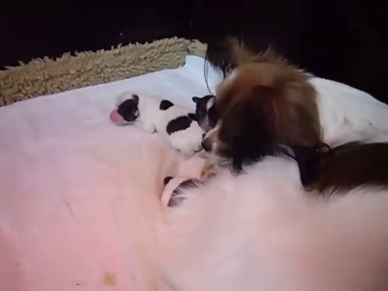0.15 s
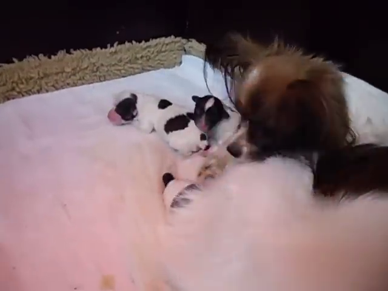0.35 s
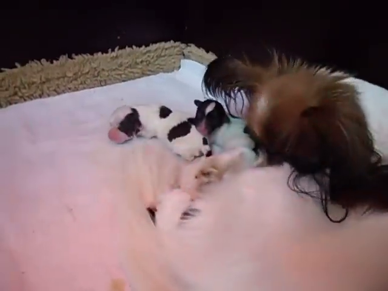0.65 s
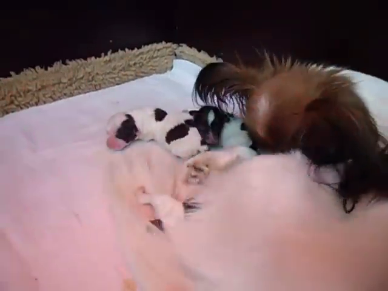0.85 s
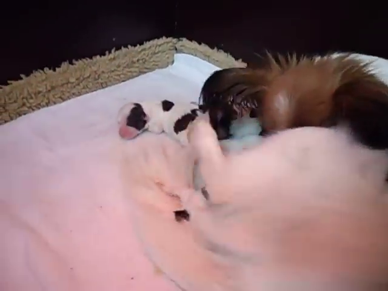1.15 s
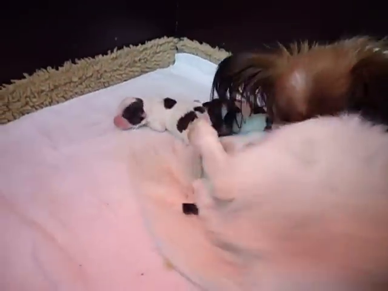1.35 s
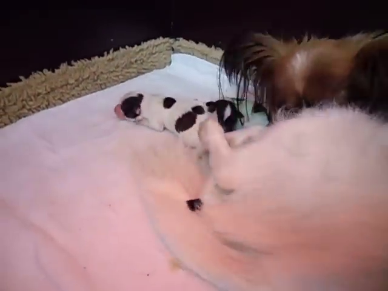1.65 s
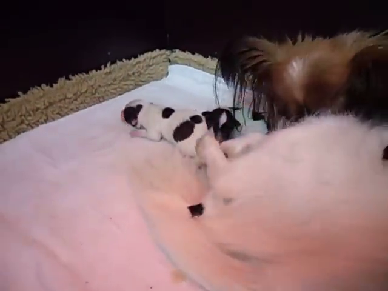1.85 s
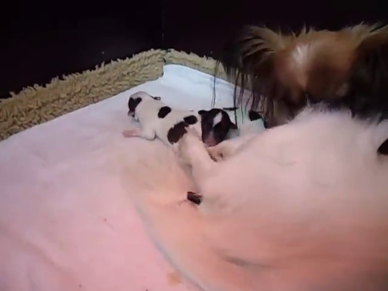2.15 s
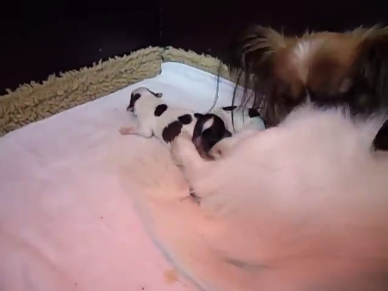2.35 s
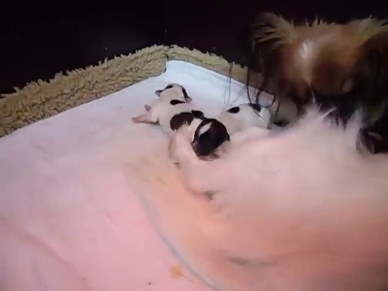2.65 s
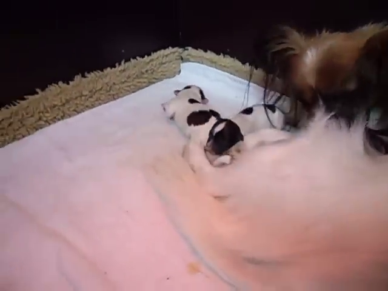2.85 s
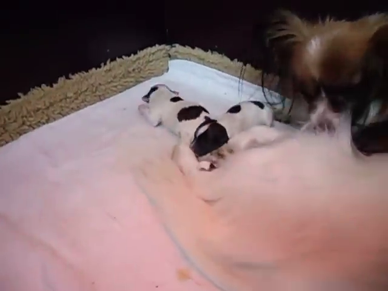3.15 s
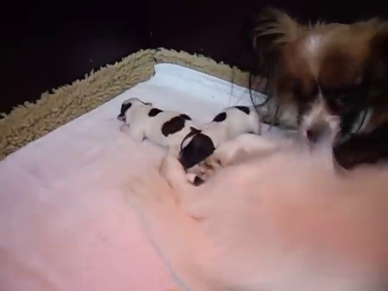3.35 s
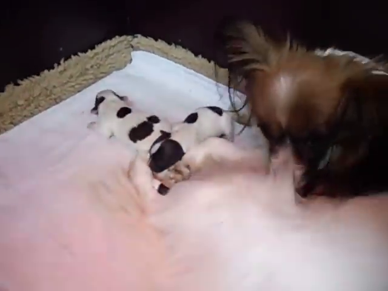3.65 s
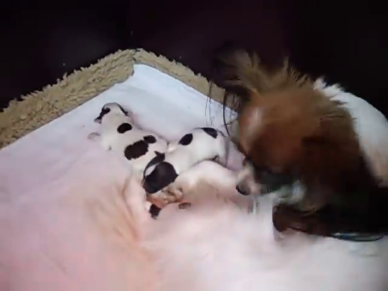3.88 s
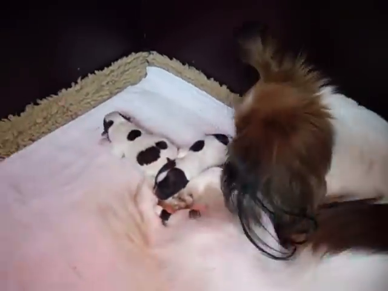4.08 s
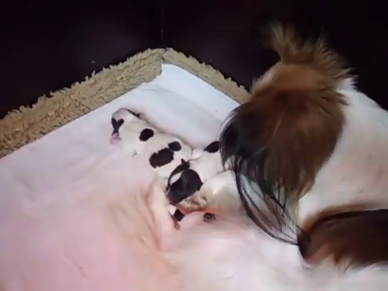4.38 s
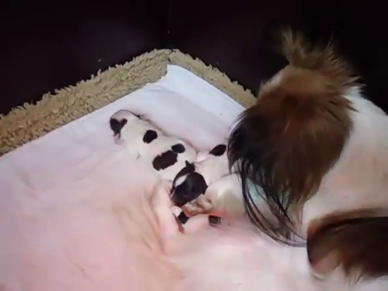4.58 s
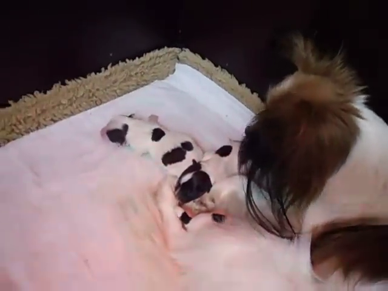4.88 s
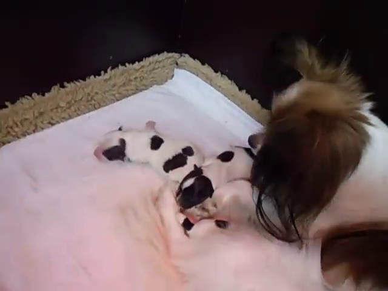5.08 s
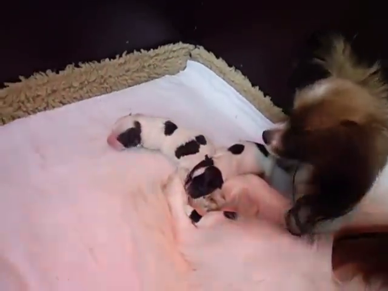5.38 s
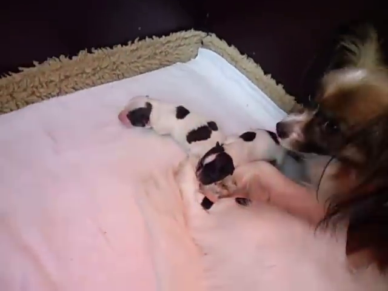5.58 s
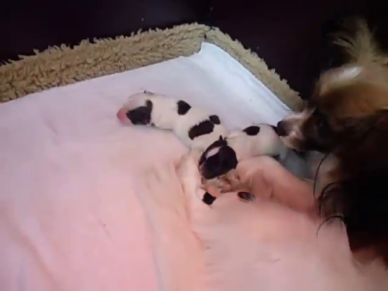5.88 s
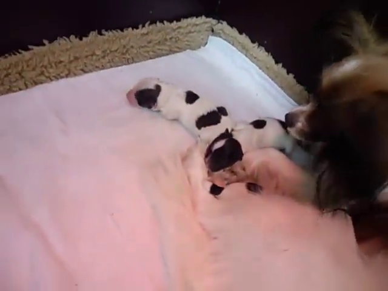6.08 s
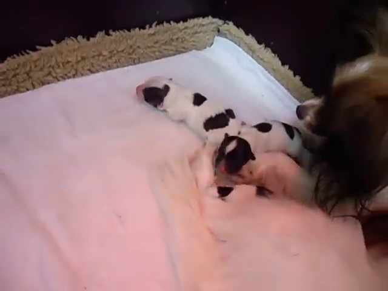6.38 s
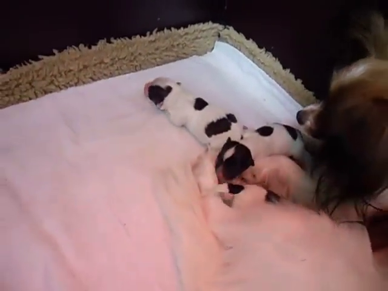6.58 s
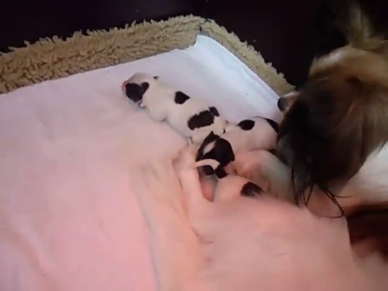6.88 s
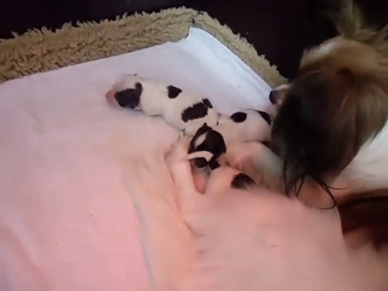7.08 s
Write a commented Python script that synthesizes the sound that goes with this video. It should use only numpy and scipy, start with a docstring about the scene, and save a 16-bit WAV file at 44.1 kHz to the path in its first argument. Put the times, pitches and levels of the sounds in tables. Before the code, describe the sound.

Newborn puppies are heard close up in a quiet furnished room, with a faint steady hiss, wavering low rumble and dull blanket brushing underneath. A sharp yelp starts at once and sinks to a low whine by 0.2 s. A weak squeak rises at 0.4 s, overtaken by a louder, brighter cry around 0.6-0.75 s. Low husky whimpers and a tiny grunt follow at 0.9-1.2 s. A thin squeal climbs from 1.5 to 1.9 s; another wavers from 2.2 to 2.7 s. A soft whine at 3.0 s leads into a high cry until 3.7 s. Stronger, piercing squeals come at 4.0-4.5, 4.7-5.1 and 5.3-5.8 s, catching and breaking briefly. Small closed-mouth grunts follow, then a raspy squeal at 6.0-6.45 s, more low grunts near 6.6 s, and a final thin, wavering cry from 6.75 s to the end. Faint wet ticks are scattered between.

```python
"""Newborn puppies in a whelping box

Puppies squeak in a padded box, close to a small camera in a quiet room. Their cries mostly rise and fall in pitch:
harmonics of tiny vocal folds ring in a short throat, rasp under strain and at times beat in threes.
Between cries come low whimpers and closed-mouth grunts, made the same way with more rasp, and small wet ticks of
noise. Underneath lie two wavering drones in a low rumble, dull brushing of the blanket and a steady hiss."""
import sys
import numpy as np
from scipy import signal
from scipy.fft import rfft, irfft, next_fast_len
from scipy.io import wavfile
from scipy.ndimage import uniform_filter1d, map_coordinates

SR = 44100
rng = np.random.default_rng(int(sys.argv[2]) if len(sys.argv) > 2 else 0)


def digitize_waveform(pressure):
    """Quantize a signal to 16-bit integers and store it at the path in sys.argv[1].

    Rows of a 2-D input are taken as channels; values are limited to [-1, 1].
    """
    field = np.atleast_2d(pressure).T
    bounded = np.clip(field, -1, 1)
    quanta = np.round(bounded * 32767).astype(np.int16)
    wavfile.write(sys.argv[1], SR, quanta)


N = 318843
T = np.arange(N) / SR  # seconds


def undb(db):
    """Decibels to gain."""
    return 10 ** (np.asarray(db) / 20)


def unit(x):
    """Scale to rms 1."""
    return x / np.sqrt(np.mean(x ** 2))


def curves(rows, t):
    """The columns of a table, joined by straight lines in time."""
    seconds, *columns = np.transpose(rows)
    return [np.interp(t, seconds, column) for column in columns]


def shape_db(points, hz):
    """Read a spectrum of (Hz, dB) points on a log-frequency axis."""
    f, db = np.transpose(points)
    return np.interp(np.log(np.maximum(hz, 1)), np.log(f), db)


def coloured(points):
    """Noise of rms 1 with a spectrum of the given (Hz, relative dB) shape."""
    size = next_fast_len(N)
    hz = np.arange(size // 2 + 1) * SR / size
    spectrum = rfft(rng.standard_normal(size)) * undb(shape_db(points, hz))
    return unit(irfft(spectrum, size)[:N])


def wander(hz, size):
    """Smooth random motion, mostly slower than hz, with a spread of about 1."""
    knots = np.arange(size) * 2 * hz / SR
    values = rng.standard_normal(int(knots[-1]) + 2)
    return map_coordinates(values, [knots], order=3, mode="nearest")


def swells(rows, t):
    """The sum of a bell-shaped swell for each row; half is the time from the centre to 1/e."""
    return sum(depth * np.exp(-((t - centre) / half) ** 2) for centre, half, depth in rows)


def hoarseness(hz, level_db, t, rough):
    """Total rasp of the folds, and the smaller part heard as air: strained folds vibrate chaotically."""
    # The folds break into a rasp. Each row: centre in seconds, half length in seconds, depth from 0 to 1.
    rasp_bursts = [(.105,0.013,0.38),(.228,.007,0.7),(.635,.013,0.04),(.982,0.015,0.54),(1.161,.0035,0.6),(1.555,0.069,.1),(2.243,.013,0.12),(2.705,0.02,0.63),(2.97,.008,0.1),(3.1,.019,0.25),(3.145,0.0055,0.4),(3.994,0.0048,0.5),(5.325,0.0089,0.07),(5.056,0.007,0.4),(6.057,0.012,0.15),(6.095,.02,.15),(6.23,0.037,.06),(6.765,0.003,.33),(6.797,0.0096,.18)]
    break_hz, break_width_hz, break_rasp, push_db = 1940, 200, 0.14, -38.5
    rise_hz_per_s, falling_share = 2000, .2
    collapse_s, collapse_hz, collapse_rasp = .018, 1300, .42
    break_air, collapse_air = 0.81, .15  # share of each kind of hoarseness that is heard as air
    # pushed hard through the change of register, the folds turn hoarse; much less so on the way down
    near_break = np.exp(-((hz - break_hz) / break_width_hz) ** 2)
    push = np.minimum(undb(level_db - push_db), 1)
    rising = np.clip(np.gradient(hz) * SR / rise_hz_per_s, 0, 1)
    strain = break_rasp * near_break * push * (falling_share + (1 - falling_share) * rising)
    # a call collapses at its end, most of all at low pitch
    collapse = collapse_rasp * np.exp((t - t[-1]) / collapse_s) / (1 + (hz / collapse_hz) ** 4)
    rasp = rough + strain + collapse + swells(rasp_bursts, t)
    airy = rasp - (1 - collapse_air) * collapse - (1 - break_air) * strain
    return rasp, airy


def throat_gains(hz, slope_db, bright_db, treble_db, roll_db):
    """Gains of eight harmonics: they fall with their number and rise in the throat's resonances."""
    # Throat and mouth of a puppy. Each row: frequency in Hz, relative gain in dB.
    throat = [(450,-14.5),(700,-13.5),(1000,-10),(1400,-6.5),(1800,-0.5),(2200,0),(2450,1),(2750,8),(3200,4),(3650,3.5),(4000,-3),(4400,-8),(5100,-14.5),(6000,-15.5),(6500,-9.5),(7000,-2.5),(7700,-13.5),(8400,-39.5)]
    upper_share = 0.34  # share of the brightness that reaches the harmonics above the octave
    k = np.arange(1, 9)[:, None]
    lift_db = bright_db * ((k == 2) + upper_share * (k > 2))
    lift_db = lift_db + (k > 2) * (treble_db + roll_db * np.log2(k / 3))
    gains = undb(shape_db(throat, k * hz) + slope_db * np.log2(k) + lift_db)
    gains = gains * (k * hz < SR / 4)
    return k, gains / np.linalg.norm(gains, axis=0)


def thirds_of_pitch(phase, fundamental, t):
    """Period tripling: unsteady lines at thirds of the pitch, strongest just under the octave."""
    # The voice beats in threes. Each row: centre in seconds, half length in seconds, depth from 0 to 1.
    triple_beats = [(1.598,0.034,0.12),(4.15,0.055,0.03),(5.6,0.13,0.06),(6.082,0.019,0.06),(6.115,0.018,0.08),(6.27,0.14,0.04),(6.87,0.032,0.17),(6.99,0.082,0.05),(7.19,.06,0.02)]
    depth = swells(triple_beats, t) * fundamental
    lines = 0
    for thirds, db in zip((1, 2, 4, 5), (-10.5, -12, -4, 0)):
        unsteady = undb(db + 3.0 * wander(25, len(t)))
        lines = lines + depth * unsteady * np.sin(thirds * phase / 3)
    return lines


def voice(rows, slope_db, rough, treble_db=0, roll_db=0, rasp_hz=520, jitter=.004, edge_s=.004):
    """One call as (tone, air level): harmonics of the folds slide through the fixed throat."""
    # The voice catches for an instant. Each row: centre in seconds, half length in seconds, dip in dB.
    voice_catches = [(1.538,0.0012,-16),(1.868,.005,-14),(4.917,.006,-12),(4.5,0.0035,-20),(5.4,0.0034,-26),(6.052,0.0021,-9.5),(5.5,0.0021,-27)]
    shimmer_db, rasp_depth, rasp_air_db, air_db = 2.0, 0.69, -4, -41
    first = max(int((rows[0][0] - edge_s / 2) * SR), 0)
    last = min(int((rows[-1][0] + edge_s / 2) * SR), N)
    t = T[first:last]
    size = len(t)
    hz, level_db, bright_db = curves(rows, t)
    # tension changes smoothly, with a slight tremble
    hz = uniform_filter1d(hz, size=500, mode="nearest") * (1 + jitter * wander(45, size))
    rasp, airy = hoarseness(hz, level_db, t, rough)
    # chaotic folds scatter the timing and strength of the cycles
    phase = 2 * np.pi * np.cumsum(hz) / SR + .3 * rasp * wander(rasp_hz, size)
    strength = undb(shimmer_db * wander(70.55, size) + swells(voice_catches, t))
    strength = strength * (1 + rasp_depth * rasp * wander(rasp_hz, size))
    k, gains = throat_gains(hz, slope_db, bright_db, treble_db, roll_db)
    tone = np.sum(gains * np.sin(k * phase), axis=0) + thirds_of_pitch(phase, gains[0], t)
    air = undb(air_db) + undb(rasp_air_db) * airy
    edges = np.clip(np.minimum(t - t[0], t[-1] - t) / edge_s, 0, 1)
    call = np.array([np.sqrt(2) * tone * strength, air]) * undb(level_db) * edges
    return np.pad(call, ((0, 0), (first, N - last)))


def glide(event, arch=0., release_s=.025):
    """The controls of a short call: a slide of pitch, arched if asked, under attack, hold and release."""
    start, length, first_hz, last_hz, db, bright_db = event
    attack_s, fade_db = .016, 10
    u = np.linspace(0, 1, 33)
    hz = (first_hz + (last_hz - first_hz) * u) * (1 + arch * np.sin(np.pi * u) ** 2)
    held = np.clip(np.minimum(u * length / attack_s, (1 - u) * length / release_s), 0, 1)
    level_db = db - fade_db * (held.max() - held)
    return np.transpose([start + u * length, hz, level_db, np.full_like(u, bright_db)])


def open_calls():
    """Cries, squeaks and whimpers: their air hisses in the open mouth's main resonance."""
    # The long cries. Each row: treble in dB, roll-off above the third harmonic in dB per octave, and a
    # curve of points: time in seconds, pitch in Hz, level in dB, brightness in dB.
    long_cries = [(1.5, -0.5, [(0.0, 1268, -31, 0), (0.007, 1213, -42.5, 9), (0.031, 1376, -40.5, -5),
                  (0.063, 1436, -37.5, 3.5), (0.075, 1453, -43, -18), (0.089, 1421, -38, 8.5),
                  (0.097, 1302, -48, 3), (0.121, 985, -43, 2), (0.181, 751, -49.5, 6),
                  (0.221, 737, -48.5, 12), (0.231, 777, -52, -3)]), (-1.5, 2, [(0.403, 1092, -59, 1),
                  (0.414, 1032, -54.5, -4.5), (0.438, 1167, -51.5, 8.5), (0.468, 1365, -50, -11.5),
                  (0.502, 1502, -47, 5), (0.566, 1444, -46.5, 5.5), (0.626, 1353, -52, 1),
                  (0.65, 1000, -49, -7)]), (1, 0.5, [(1.49, 1330, -48.5, -1), (1.503, 1230, -43.5, -1.5),
                  (1.529, 1515, -38.5, 8), (1.557, 1605, -37.5, -7), (1.575, 1680, -46, 10.5),
                  (1.629, 1805, -44.5, -5.5), (1.649, 1790, -49.5, 6), (1.683, 2151, -53.5, 2),
                  (1.757, 2212, -49, -4.5), (1.815, 2162, -52.5, 2), (1.853, 2030, -69, 13),
                  (1.878, 1921, -54, 1.5), (1.912, 1570, -61, -3), (1.918, 1584, -77, -4)]),
                  (-12, -6, [(2.2, 1665, -51, 7), (2.219, 1731, -43, 12), (2.301, 1902, -48, -15),
                  (2.335, 1580, -50, 22), (2.359, 1447, -55.5, 3), (2.385, 1550, -54.5, 12.5),
                  (2.401, 1775, -56.5, 5), (2.459, 1915, -47.5, -10), (2.489, 1965, -52, -1.5),
                  (2.567, 1944, -48, -17), (2.586, 2012, -54, -14), (2.622, 2088, -45.5, -15),
                  (2.65, 1918, -44.5, -12), (2.696, 1377, -54.5, -2.5), (2.718, 1120, -60.5, -18)]),
                  (3, -28, [(2.965, 860, -60, 4), (2.972, 831, -65, -7.5), (3.02, 935, -48, 17),
                  (3.058, 908, -55, 13), (3.096, 830, -57, -5), (3.124, 895, -52.5, 12),
                  (3.192, 1086, -48.5, 23), (3.244, 1176, -48.5, 7.5), (3.284, 1403, -52.5, -2.5),
                  (3.304, 1675, -66, -12)]), (-6.5, -6, [(3.303, 1670, -52, -14), (3.316, 1770, -49, -6),
                  (3.345, 2063, -46.5, 4), (3.395, 1899, -42.5, 6), (3.459, 2236, -43.5, -3),
                  (3.477, 2262, -48, 3), (3.501, 2233, -41.5, 1), (3.547, 2057, -39, 7.5),
                  (3.617, 2144, -44, 7.5), (3.651, 2003, -39.5, 6.5), (3.671, 1864, -40.5, 2),
                  (3.697, 1436, -47.5, -2), (3.705, 1185, -43.5, -5.5), (3.719, 1035, -59.5, -6)]),
                  (-6, -14, [(3.95, 1440, -45.5, 3), (3.967, 1583, -37.5, 8.5), (3.999, 1910, -42, 4.5),
                  (4.013, 2004, -33, -2.5), (4.093, 2247, -44, 2.5), (4.123, 2220, -46, 2),
                  (4.171, 2316, -41, -2.5), (4.215, 2222, -36.5, 1.5), (4.269, 2215, -40, -0.5),
                  (4.307, 2367, -40.5, -7.5), (4.329, 2270, -39, 4), (4.376, 2066, -31, -2.5),
                  (4.424, 2035, -33.5, -3.5), (4.456, 1847, -36, -4.5), (4.466, 1730, -42.5, -6),
                  (4.478, 1420, -47, -12), (4.486, 1335, -50, -9.5)]), (1.5, -7, [(4.715, 1293, -50, -14),
                  (4.744, 1665, -33.5, 14.5), (4.764, 1854, -33.5, -5), (4.806, 2180, -40, 9),
                  (4.826, 2248, -43, 6.5), (4.854, 2240, -63, 15), (4.866, 2305, -41, -5),
                  (4.904, 2210, -70, 1), (4.938, 2327, -57, 8), (4.958, 2220, -45, -1),
                  (4.968, 2063, -55, 5), (4.986, 2050, -43, 8), (5.024, 1546, -43, 6.5),
                  (5.044, 1415, -45, 2), (5.064, 1107, -53, -3.5), (5.072, 1155, -47, -1.5)]),
                  (2.5, -14, [(5.287, 1320, -43, -0.5), (5.332, 1647, -30.5, 5), (5.35, 1723, -34.5, 1.5),
                  (5.362, 1760, -44, 12), (5.382, 1885, -38, 2.5), (5.418, 1992, -47, 12),
                  (5.474, 2075, -40.5, -5.5), (5.504, 1952, -44.5, 9.5), (5.64, 1995, -50, 10.5),
                  (5.658, 1934, -45, -1.5), (5.693, 1922, -46, -1), (5.709, 1896, -43.5, -17),
                  (5.717, 1850, -56.5, 5.5), (5.739, 1693, -40, 6), (5.755, 1583, -44, 3),
                  (5.769, 1515, -55, -10)]), (1.5, -19, [(6.005, 1295, -48, -2), (6.022, 1500, -39.5, 2.5),
                  (6.042, 1612, -31, 7), (6.056, 1612, -31, 7.5), (6.084, 1861, -45, 3),
                  (6.09, 1896, -37.5, -10), (6.106, 2090, -40, 5), (6.12, 2184, -45, -3),
                  (6.162, 2257, -51, 9), (6.218, 2157, -44.5, -6), (6.26, 2155, -45, -4),
                  (6.302, 2194, -50, 3), (6.348, 2156, -47, -8), (6.421, 2157, -49, 1.5),
                  (6.449, 2135, -62, -4)]), (1, -6, [(6.753, 1562, -46, -15), (6.778, 1690, -43.5, -6),
                  (6.786, 1741, -40.5, 17), (6.822, 1840, -38, -1), (6.86, 2136, -47.5, 10.5),
                  (6.914, 2250, -48.5, -9), (6.938, 2184, -44.5, 6), (6.96, 2100, -47, 6),
                  (7.01, 2156, -46, 4), (7.024, 2248, -51, -8), (7.06, 2165, -52.5, -5),
                  (7.074, 2230, -72, -3), (7.094, 2160, -68, 2)]), (-2, 2, [(7.119, 2280, -73, 1),
                  (7.13, 2320, -57.5, 11), (7.151, 2300, -53.5, 11), (7.191, 2110, -50.5, -5),
                  (7.227, 2130, -49, 6)])]
    # Littermates cut in with falling squeaks. Each row: start in seconds, length in seconds,
    # first pitch in Hz, last pitch in Hz, level in dB, brightness in dB.
    side_squeaks = [(0,0.056,1180,744,-55.5,-2),(.1,.085,1270,1020,-56,-4),(3.476,0.043,1980,1570,-60,22),(3.65,0.05,1480,1198,-62.5,14),(7.05,.07,1930,1810,-66,2)]
    # A littermate's loud, bright cry. Each row: time in seconds, pitch in Hz, level in dB, brightness in dB.
    littermate_cry = [(.555,1329,-57,12),(.59,1195,-50,-1.5),(.618,1351,-35.5,9.5),(.655,1388,-38,-9.5),(.69,1317,-43,10),(.71,1095,-44,-6),(.729,931,-41,0),(.755,905,-54,-27)]
    # Low open-mouthed whimpers. Each row: start in seconds, length in seconds, first pitch in Hz,
    # last pitch in Hz (both before the arch), level in dB, brightness in dB.
    low_whimpers = [(0.896,0.1086,623,617,-58.5,1.5),(1.095,0.0715,604,622,-58,-10.5)]
    clear, husky = .012, .19  # steady rasp
    calls = sum(voice(rows, slope_db=-12.5, rough=clear, treble_db=treble, roll_db=roll)
                for treble, roll, rows in long_cries)
    calls += sum(voice(glide(row, release_s=.02), slope_db=-8.5, rough=clear) for row in side_squeaks)
    calls += voice(littermate_cry, slope_db=-10.5, rough=clear, treble_db=-0.5, roll_db=5)
    calls += sum(voice(glide(row, arch=.11, release_s=0.019), slope_db=-4, treble_db=-13, roll_db=7,
                       rough=husky, rasp_hz=261, jitter=.02, edge_s=.008) for row in low_whimpers)
    tone, air = calls
    open_mouth = coloured([(300, -29.5), (900, -9.5), (1800, -19), (2800, -1.5), (3500, 2.5),
                           (4300, -12), (5200, -18.0), (6800, -11.5), (8500, -31.0)])
    return tone + air * open_mouth


def grunts(tone_db=-2, air_trim_db=-1):
    """Closed-mouth grunts: rough, low folds, with air that hisses lower behind the shut lips."""
    # Each row: start in seconds, length in seconds, first pitch in Hz, last pitch in Hz,
    # level in dB before the trims above, brightness in dB.
    grunt_rows = [(1.15,0.021,650,606,-53,-1),(5.813,0.071,708,539,-60,-3.5),(5.902,0.047,627,782,-58,-8),(6.53,0.033,1068,1030,-62,-15),(6.552,0.033,566,452,-58,-5),(6.587,0.059,505,518,-65.5,8),(6.635,.05,408,420,-62,18)]
    tone, air = sum(voice(glide(row, release_s=0.017), slope_db=-14, treble_db=-5.5, roll_db=-9,
                          rough=.65, rasp_hz=130, jitter=.045, edge_s=0.0057) for row in grunt_rows)
    closed_mouth = coloured([(200, -20), (550, -1), (850, 2), (1200, -8), (2000, -19), (4000, -37)])
    return undb(tone_db) * tone + undb(air_trim_db) * air * closed_mouth


def drone(hz, waver, octave_db):
    """A low wavering tone with a weak octave."""
    phase = 2 * np.pi * np.cumsum(hz * (1 + waver * wander(5, N))) / SR
    return np.sqrt(2) * (np.sin(phase) + undb(octave_db) * np.sin(2 * phase))


def low_rumble(deep_db=-1, upper_db=-2.0, noise_db=-4):
    """Two wavering low drones, with rumbling noise that swells along with the upper one."""
    # A low rumble in the room. Each row: time in seconds, deep drone in dB, upper drone in dB,
    # both before the trims above.
    rumble_levels = [(0.02, -52, -53), (0.1, -47.5, -46), (0.42, -60.5, -49), (1.26, -44, -51.5),
                     (1.34, -50.5, -52.5), (1.98, -44.5, -47.5), (2.58, -43.5, -52), (2.7, -52.5, -52.5),
                     (3.38, -40.5, -54.5), (4.34, -39.5, -63), (4.46, -35, -47.5), (4.7, -52, -50.5),
                     (4.82, -40.5, -45.5), (4.98, -45.5, -52), (5.18, -50, -47.5), (5.38, -63.5, -41),
                     (6.06, -64, -50), (7.22, -68, -52)]
    deep, upper = undb(curves(rumble_levels, T))
    drones = deep * undb(deep_db) * drone(29.75, waver=0.0681, octave_db=-16.5)
    drones += upper * undb(upper_db) * drone(53.3, waver=0.0804, octave_db=-25.5)
    noise = coloured([(18, -17), (38, 1.5), (54, 0), (68, -3.5), (85, -8.5), (130, -30.5),
                      (250, -43.5), (600, -83.0)])
    return drones + upper * undb(noise_db) * noise


def brushes():
    """Soft, dull bands of noise that swell and fade: mostly movements of the mother on the blanket."""
    # The mother shifts on the blanket; the row at 1.6 s is rather a dull swell near 70 Hz that thickens the #
    # deep drone's octave. Each row: centre in seconds, half length in seconds, level in dB, centre of the band
    # in Hz.
    mother_shifts = [(.13,0.081,-65,90),(.8,0.55,-63.5,89),(1.3,.6,-73.5,380),(1.603,.45,-61.5,70.4),(2.755,0.015,-59.5,130),(3.68,0.13,-74.5,424),(4.7,.25,-60.5,105),(4.68,0.1,-65.5,325),(5.17,0.18,-60.5,135),(5.55,0.35,-70.5,412),(5.6,.25,-62,110),(6.2,0.51,-68.5,423),(6.3,0.41,-64.5,130),(7.046,0.27,-76.5,415)]
    slope_db = -24.5  # per octave below the band's centre; half as steep again above it
    total = np.zeros(N)
    for centre, half, db, hz in mother_shifts:
        band = coloured([(hz / 4, 2 * slope_db), (hz, 0), (hz * 4, 3 * slope_db), (hz * 16, 6 * slope_db)])
        total += swells([(centre, half, undb(db))], T) * band
    return total


def background():
    """The floor of the place: low rumble, blanket brushes, a steady dull blanket noise and a hiss."""
    # Steady blanket noise. Each row: frequency in Hz, relative density in dB per Hz.
    blanket_spectrum = [(60,-11),(90,-0.5),(150,-1),(220,-20.5),(330,-9.5),(430,-9),(560,-22),(1000,-21),(2000,-44)]
    # Steady hiss. Each row: frequency in Hz, relative density in dB per Hz.
    hiss_spectrum = [(100,10.5),(250,5),(420,-7.5),(600,-1),(1000,-4),(2000,-5),(3000,-6),(5000,-7),(7200,-8.5),(8000,-19.5),(8800,-38)]
    blanket = undb(-69) * coloured(blanket_spectrum)
    hiss = undb(-66.5) * coloured(hiss_spectrum)
    return low_rumble() + brushes() + blanket + hiss


def ticks(rise_s=0.0033, gain_db=-5):
    """Short soft smacks: bursts of bright noise that rise and decay exponentially, without a ring."""
    # Wet ticks of mouths and paws. Each row: peak time in seconds, peak in dB before the gain above,
    # decay in seconds.
    wet_ticks = [(0.2514,-57.5,.018),(1.6744,-55.5,.004),(2.2852,-56,.004),(2.6683,-66,.04),(3.0744,-59.5,.02),(3.4002,-62,.008),(3.459,-59,.005),(3.5269,-58,.005)]
    envelope = np.zeros(N)
    for peak_s, db, decay_s in wet_ticks:
        distance = np.maximum((peak_s - T) / rise_s, (T - peak_s) / decay_s)
        envelope += undb(db) * np.exp(-distance.clip(max=50))
    smack = coloured([(500, -24.5), (2000, 1), (4000, -2.5), (6300, 5.5), (7500, -1.5), (9000, -35.0)])
    return undb(gain_db) * envelope * smack


def room(x):
    """A furnished room: a short, weak, diffuse tail of decaying noise after a small gap."""
    t60_s, wet_db, gap_s = .38, -24.5, .005
    t = T[:SR // 2]
    tail = rng.standard_normal(len(t)) * np.exp(-np.log(1000) * t / t60_s) * (t > gap_s)
    return x + undb(wet_db) * signal.fftconvolve(x, tail / np.linalg.norm(tail))[:N]


def scene():
    """The litter in its room, over the background."""
    litter = open_calls() + grunts() + ticks()
    return (room(litter) + background())[None]


def record(dry):
    """The camera cuts the top steeply, above 8700 Hz."""
    top_cut = signal.ellip(8, .2, 70, 8700, fs=SR, output="sos")
    return signal.sosfilt(top_cut, dry)


dry = scene()
out = record(dry)
digitize_waveform(out)
```